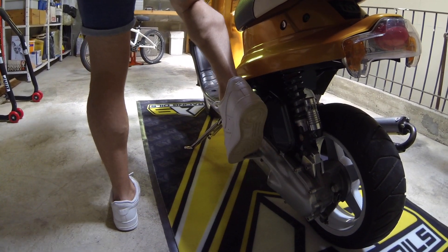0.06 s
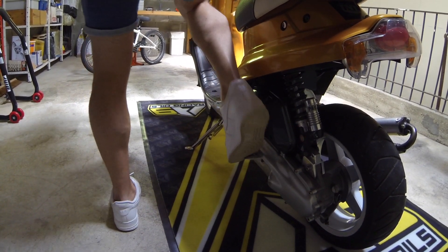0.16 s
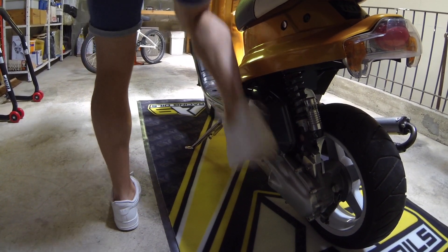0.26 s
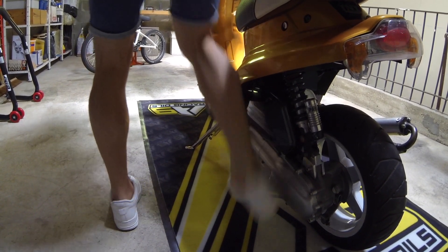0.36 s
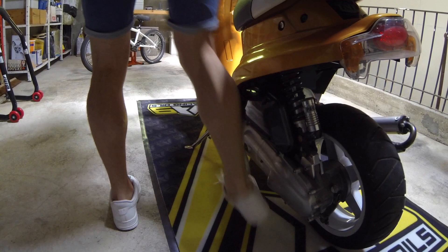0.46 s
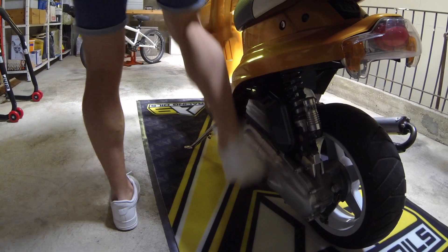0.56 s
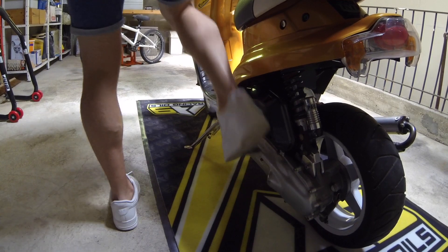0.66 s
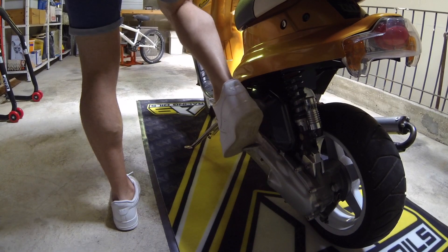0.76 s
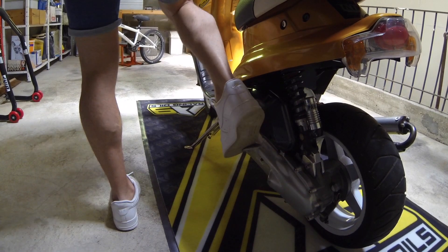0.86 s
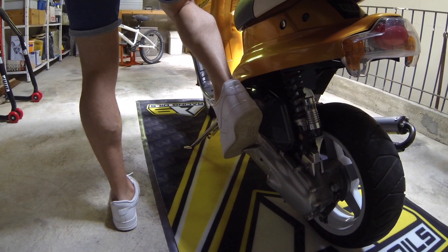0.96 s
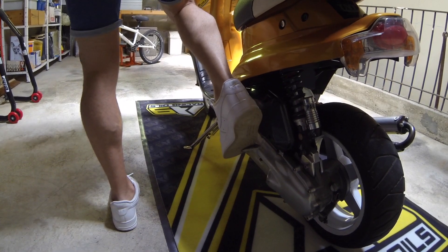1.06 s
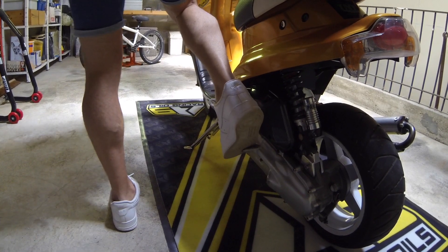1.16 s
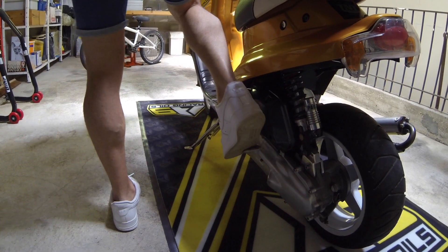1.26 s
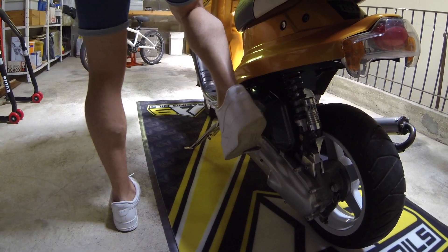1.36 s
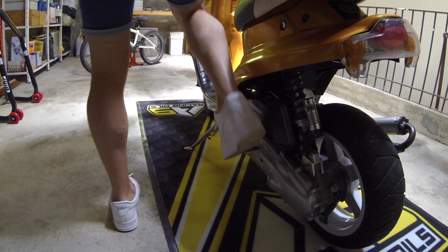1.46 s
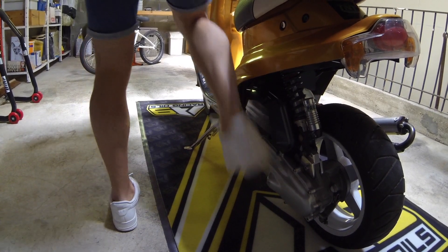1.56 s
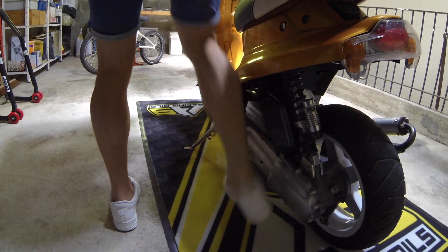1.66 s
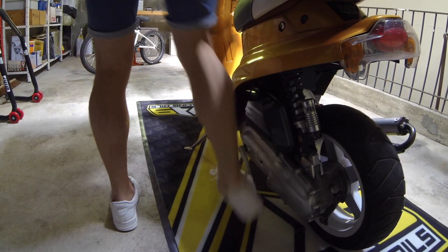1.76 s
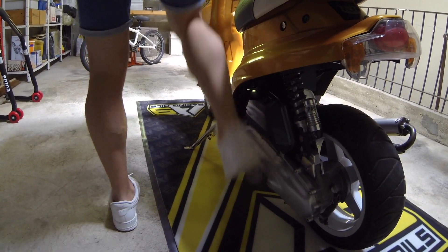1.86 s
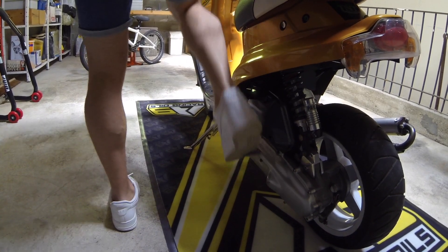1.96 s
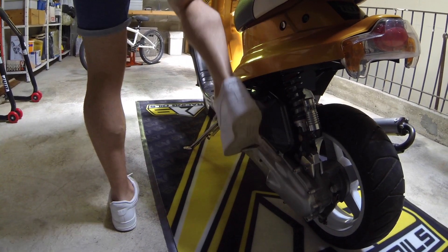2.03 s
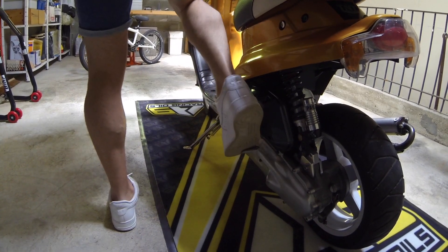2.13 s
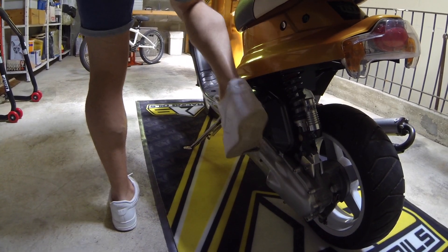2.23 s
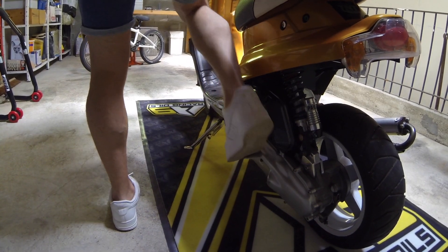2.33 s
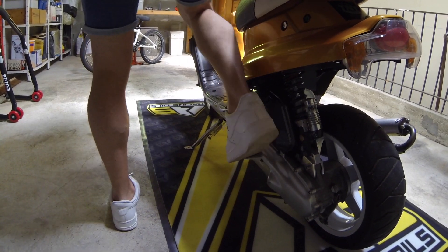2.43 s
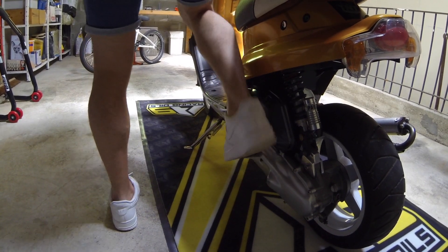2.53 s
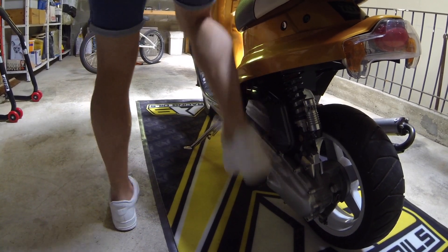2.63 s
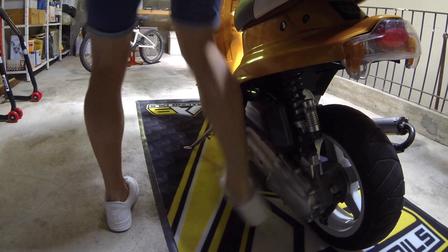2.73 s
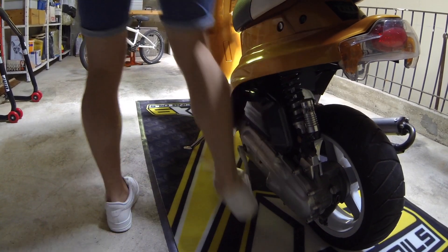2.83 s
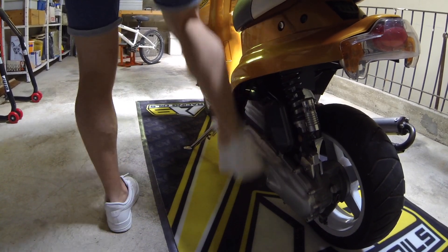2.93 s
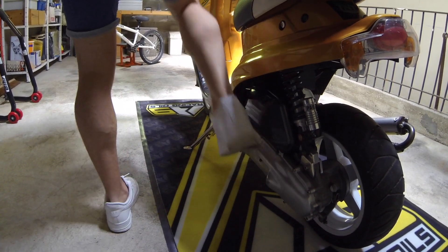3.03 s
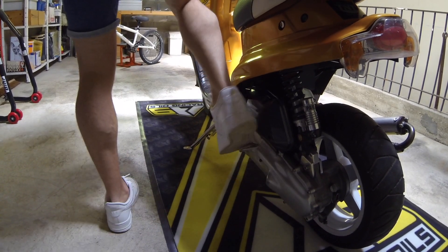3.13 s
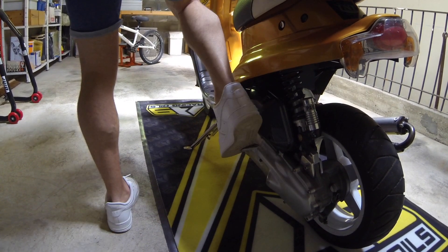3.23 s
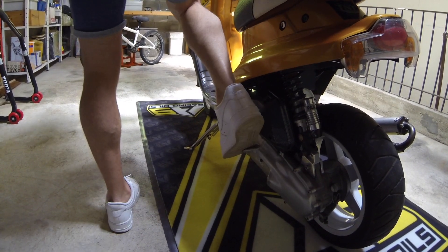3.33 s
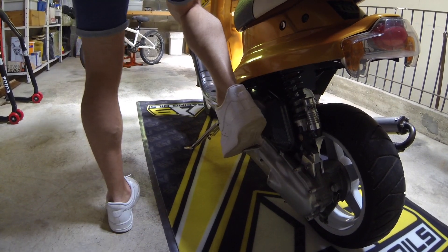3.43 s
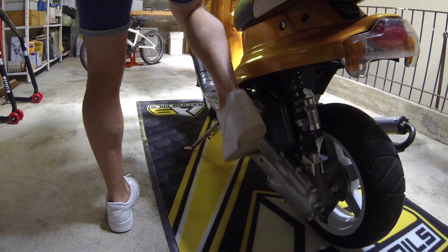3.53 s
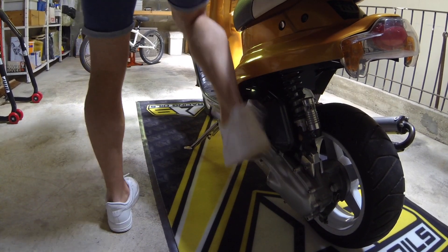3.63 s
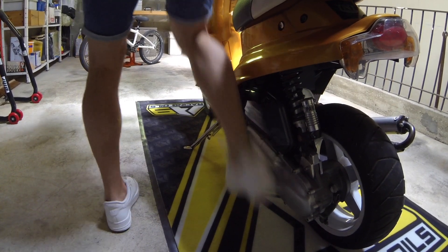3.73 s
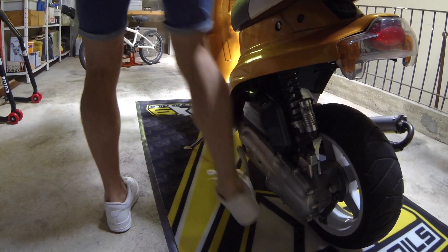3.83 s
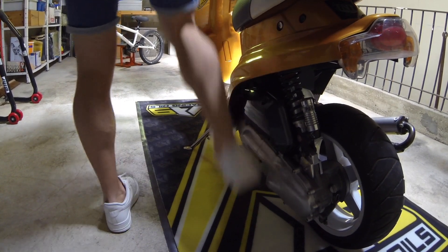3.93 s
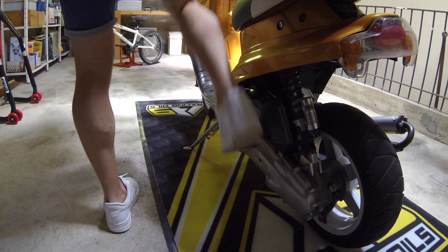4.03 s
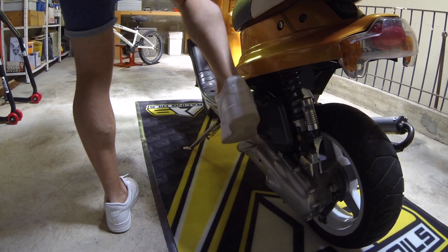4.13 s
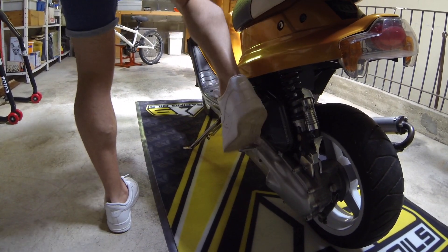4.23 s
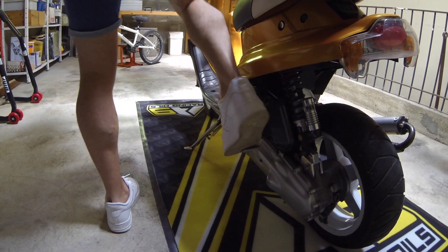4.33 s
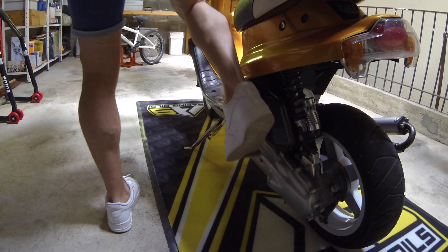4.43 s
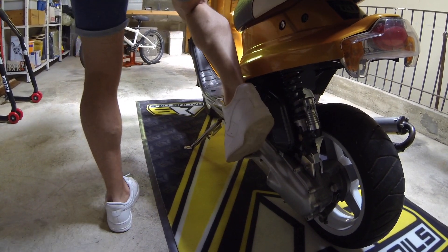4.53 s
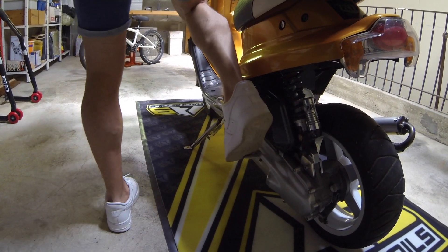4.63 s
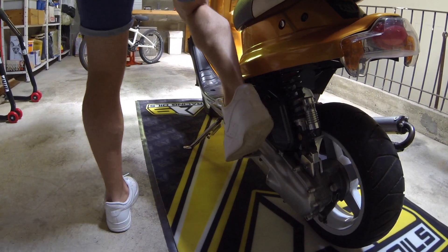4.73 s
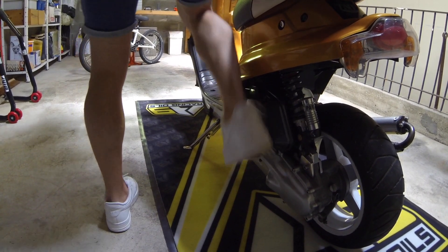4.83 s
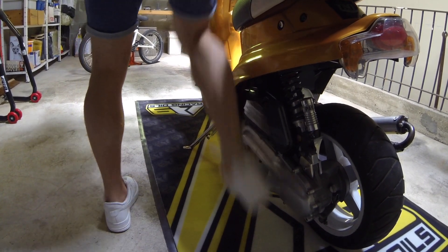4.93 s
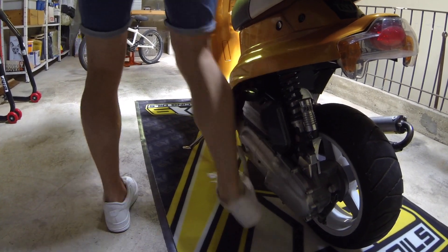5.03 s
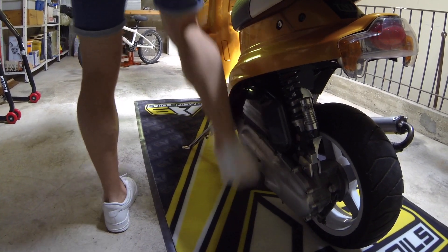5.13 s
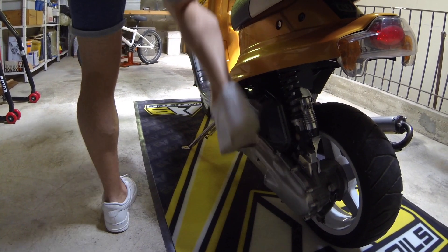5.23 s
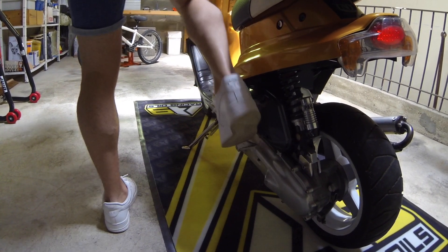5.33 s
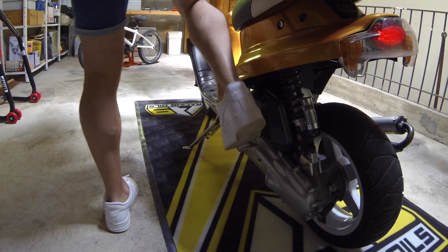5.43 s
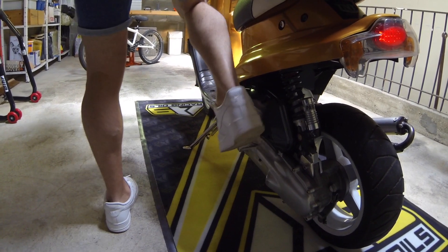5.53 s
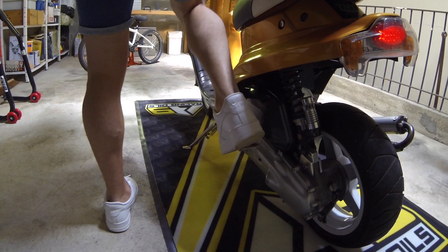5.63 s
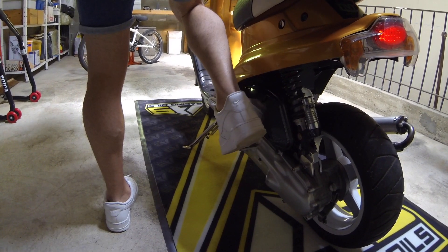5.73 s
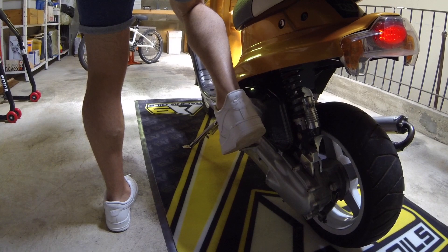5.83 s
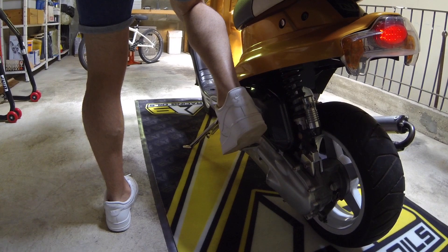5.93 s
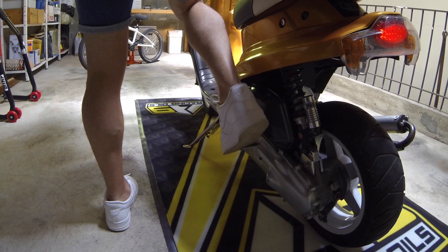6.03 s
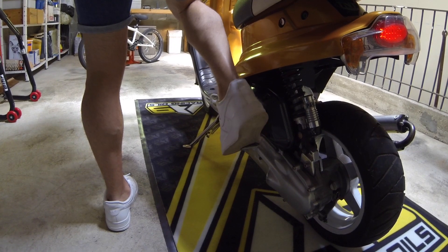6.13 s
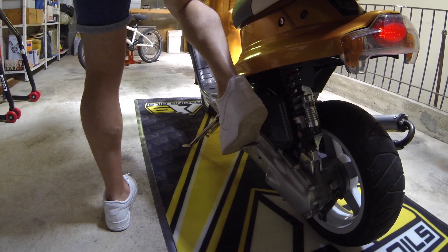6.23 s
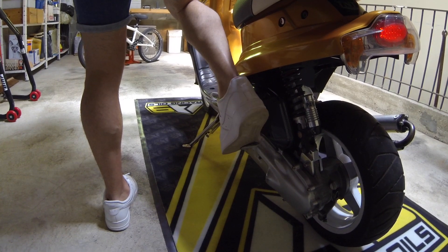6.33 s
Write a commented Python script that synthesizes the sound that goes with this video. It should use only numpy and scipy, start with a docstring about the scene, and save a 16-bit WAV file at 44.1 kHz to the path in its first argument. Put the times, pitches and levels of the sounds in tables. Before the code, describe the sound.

Heard from nearby in a lightly echoing garage, a scooter's kick-start lever slams down with a ringing metal clank while the engine turns over with a rattling, chuffing whirr and coasts to rest. The starter winds back with clicks, clunks and dull thumps. After four failed tries, a fifth kick makes the small two-stroke engine fire in ragged, raspy pops that soon weaken and slow.

```python
"""A two-stroke scooter is kicked over five times in a faintly rumbling concrete garage.
Each kick spins the starter gears, pumps air through the engine and slams the lever on its stop.
The crank coasts down; the starter gear winds back amid clicks, soft thumps and spring pings.
On the fifth kick the engine catches, fires unevenly for a second and runs down."""
import sys
import numpy as np
from scipy import signal
from scipy.fft import rfft, irfft
from scipy.io import wavfile

SR = 44100
rng = np.random.default_rng(int(sys.argv[2]) if len(sys.argv) > 2 else 0)


def unload_audio(sound):
    """Save the sound as a 16-bit wav file, at the path given as the first command line argument."""
    columns = np.transpose(np.atleast_2d(sound))
    # keep every value between -1 and 1, then stretch to whole-number steps
    steps = np.round(np.clip(columns, -1, 1) * 32767)
    wavfile.write(sys.argv[1], SR, steps.astype(np.int16))


N = 281799
TIME = np.arange(N) / SR
EVENT_TIME = TIME[:SR // 5]


def from_db(db):
    """Decibels to gain."""
    return 10 ** (np.asarray(db) / 20)


def unit_energy(x):
    """Scale to a sum of squares of 1."""
    return x / np.sqrt(np.sum(x ** 2) + 1e-20)


def unit_rms(x):
    """Scale to rms 1."""
    return unit_energy(x) * np.sqrt(len(x))


def at_hz(points, hz):
    """Read a table on a log-frequency axis."""
    freq_hz, value = np.transpose(points)
    return np.interp(np.log(np.maximum(hz, 1)), np.log(freq_hz), value)


def add(track, start_s, sound):
    """Mix a sound into a track."""
    i = int(np.clip(start_s * SR, 0, N))
    track[i:i + len(sound)] += sound[:N - i]


def through(x, response):
    """Convolve with an impulse response."""
    return signal.oaconvolve(x, response)[:N]


def lowpass(x, corner_hz, order=2):
    """Butterworth low-pass: a softer contact or a rounder pressure front."""
    sos = signal.butter(order, np.clip(corner_hz, 50, .45 * SR), fs=SR, output="sos")
    return signal.sosfilt(sos, x + 1e-18)


def colour(points, size=8192):
    """Minimum-phase, unit-energy response with a given spectral shape."""
    cepstrum = irfft(np.log(from_db(at_hz(points, np.fft.rfftfreq(size, 1 / SR)))))
    cepstrum[size // 2:] = 0
    cepstrum[1:] *= 2
    return unit_energy(irfft(np.exp(rfft(cepstrum))))


def body(modes, size=4096):
    """Unit-energy response of parallel resonances, alternating in sign."""
    t = TIME[:size]
    rings = [from_db(db) * width_hz * np.exp(-np.pi * width_hz * t) * np.cos(2 * np.pi * hz * t)
             for hz, width_hz, db in modes]
    return unit_energy(sum(rings[::2]) - sum(rings[1::2]))


def burst(decay_s):
    """Chattering contact: noise with a Gaussian decay."""
    return unit_energy(rng.standard_normal(len(EVENT_TIME)) * np.exp(-(EVENT_TIME / decay_s) ** 2))


def scuff(decay_s):
    """Hard contact that trails off: noise with an exponential decay."""
    return unit_energy(rng.standard_normal(len(EVENT_TIME)) * np.exp(-EVENT_TIME / decay_s))


def grains(per_s, spread_db):
    """Tiny impacts of uneven size at random times."""
    sizes = rng.choice([-1, 1], N) * from_db(spread_db * np.minimum(rng.exponential(1, N), 3))
    return unit_rms(sizes * (rng.random(N) < per_s / SR))


# background spectrum: freq_hz, gain_db
RUMBLE_COLOUR = [(12, -22.5), (22, -3), (50, -7), (87, -14), (150, -20), (200, -26.5), (450, -28),
                 (800, -35), (1400, -39.5), (2500, -44), (5000, -50.5), (12000, -58.5), (15000, -61.5)]


def rumble():
    """Steady low noise of the garage."""
    return from_db(-51) * unit_rms(through(rng.standard_normal(N), colour(RUMBLE_COLOUR)))


# reverb decay: freq_hz, t60_s
GARAGE_DECAY = [(60, 0.71), (250, 0.35), (700, 0.64), (1500, 0.54), (3000, 0.5), (6000, 0.41),
                (14000, 0.53)]


def garage(x, tail_db, early_db):
    """Concrete room: dense early reflections and a tail that decays per octave."""
    t = TIME[:SR]
    white, hz = rfft(rng.standard_normal(SR)), np.fft.rfftfreq(SR, 1 / SR)
    octave = np.round(np.log2(np.maximum(hz, GARAGE_DECAY[0][0])))
    tail = sum(irfft(white * (octave == k), SR) * from_db(-60 * t / at_hz(GARAGE_DECAY, 2 ** k))
               for k in np.unique(octave))
    early = rng.standard_normal(SR) * np.exp(-t / 0.027)
    onset = np.clip((t - .002) / .005, 0, 1)
    room = from_db(tail_db) * unit_energy(tail * onset) + from_db(early_db) * unit_energy(early * onset)
    return through(x, room)


# spring strikes: start_s, level_db
SPRING_PINGS = [(0.73, -41), (2.012, -34.5), (3.121, -39.5), (4.113, -36), (4.185, -32.5)]


def spring_pings():
    """The return spring rings in two high modes."""
    force = np.zeros(N)
    for start_s, db in SPRING_PINGS:
        add(force, start_s, from_db(db) * scuff(0.0041))
    spring = through(force, body([(9140, 670, 26), (12300, 2600, 17)]))
    return spring + garage(spring, tail_db=-6.0, early_db=-5.5)


# spectrum of thumps and pumped air: freq_hz, gain_db
AIR_COLOUR = [(20, -13), (45, -4.5), (65, 0.5), (95, -5.5), (128, 5.5), (185, -15), (245, -4), (310, -12.5),
              (420, -7.5), (1000, -54.5), (4000, -56)]
# soft thumps: start_s, level_db
THUMPS = [(0.624, -10.5), (1.8, -5.5), (2.934, -4.5), (3.989, -4.5), (4.175, -10.5), (4.518, -20.5)]


def settling_thumps():
    """The piston rocks back and the scooter settles."""
    force = np.zeros(N)
    for start_s, db in THUMPS:
        add(force, start_s, from_db(db) * burst(0.043))
    return through(force, colour(AIR_COLOUR))


# metal contact spectrum: freq_hz, gain_db
METAL_COLOUR = [(100, -3), (300, 9.5), (800, 13.5), (1400, 7), (2400, 7.5), (3800, 2.5), (5500, -7.5),
                (7500, -20.5), (10000, -13.5), (15000, -31)]


def click(db, decay_s, rise_s=0.0023, db_per_octave=13):
    """One metal contact seats: the harder, the brighter."""
    seating = np.clip(EVENT_TIME / rise_s, 0, 1)
    corner_hz = 18820 * 2 ** (db / db_per_octave)
    force = lowpass(unit_energy(seating * scuff(decay_s)), corner_hz)
    return from_db(db + 11.5) * through(force, colour(METAL_COLOUR))


# linkage contacts: start_s, strength_db, decay_s
LINKAGE_CLICKS = [(.659, -34, 0.0049), (0.799, -30.5, 0.012), (1.223, -26, 0.0083), (2.024, -27, 0.012),
                  (2.234, -23, 0.006), (2.831, -14.5, .012), (2.854, -7, 0.004), (3.418, -17.5, 0.0046),
                  (3.484, -17, 0.0035), (3.961, -24, .008), (4.317, -17, 0.0035), (4.386, -27, .004),
                  (5.133, -17, .008)]


def linkage_clicks():
    """Lever, pawl and shoe knock, metal on metal."""
    clicks = np.zeros(N)
    for start_s, db, decay_s in LINKAGE_CLICKS:
        add(clicks, start_s, click(db, decay_s))
    return clicks + garage(clicks, tail_db=-6.0, early_db=-5.5)


# starter gear returns: start_s, strength_db, decay_s
GEAR_RETURNS = [(.925, -38, 0.039), (1.466, -31, 0.025), (1.869, -8, 0.0097), (1.9, -7, 0.024),
                (2.462, -24, 0.027), (3.044, -9.5, .016), (4.092, -7.5, 0.03)]
# resonances of the return: pitch_hz, width_hz, gain_db
RETURN_MODES = [(470, 51, -9), (617, 41, -2.5), (711, 125, 11), (900, 120, -2)]


def gear_return():
    """The starter gear winds back with a clunk and lands with a click."""
    winding, landing = np.zeros((2, N))
    for start_s, db, decay_s in GEAR_RETURNS:
        add(winding, start_s, from_db(db) * scuff(decay_s))
        add(landing, start_s, click(db - 8, decay_s=.009))
    clunk = from_db(9.0) * lowpass(through(winding, body(RETURN_MODES)), 1500)
    room = garage(clunk, tail_db=-6.5, early_db=-2.0) + garage(landing, tail_db=-6.0, early_db=-5.5)
    return clunk + landing + room


# lever hits its stop: start_s, strength_db
LEVER_STOPS = [(0.3282, 3), (1.6239, 0.5), (2.678, 2.5), (3.7172, 2), (4.922, 1.5)]
# crankcase resonances: pitch_hz, width_hz, gain_db
CRANKCASE_MODES = [(223, 23, 2.5), (439, 15, 23.5), (800, 62, 15.5), (1280, 16, 3.5), (1800, 120, 7),
                   (2330, 530, -24), (2920, 640, 4.5), (4150, 380, -16), (3910, 220, -18), (4990, 120, -28)]


def lever_stop():
    """The lever slams home: the crankcase rings, bodywork excites the room, the frame booms."""
    force, shake, jolt = np.zeros((3, N))
    for start_s, db in LEVER_STOPS:
        add(force, start_s, from_db([db - 6.5]))
        add(force, start_s, from_db(db + 1.5) * burst(0.0075))
        add(shake, start_s, from_db(db) * scuff(0.0095))
        add(jolt, start_s, from_db([db]))
    case = lowpass(body(CRANKCASE_MODES, size=8192), 7700) + from_db(2.5) * colour(METAL_COLOUR)
    room = garage(through(shake, case), tail_db=-6.5, early_db=-4.5)
    frame = through(jolt, body([(67, 12, -8.5), (129, 9, -0.5), (235, 18, 0)]))
    return from_db(4.5) * (through(force, case) + room) + from_db(3) * frame


def kick_stroke(since_stop_s, slack_s=.22, push_s=0.096, bite_s=0.0234, coast_s=.48):
    """Slack taken up, drive, coast: crank speed and light gear contact, as shares of full."""
    speed = np.clip(np.minimum((since_stop_s + push_s) / bite_s, 1 - since_stop_s / coast_s), 0, 1)
    slack_db = -20 + 133.5 * np.minimum(since_stop_s + push_s, 0)
    slack = (since_stop_s > -slack_s) * (since_stop_s < 0) * from_db(slack_db)
    return speed, slack


# starter gear resonances: pitch_hz, width_hz, gain_db
GEAR_MODES = [(258, 62, 4.5), (478, 27, 6), (630, 66, -11.5), (706, 250, 7.5), (905, 89, -1),
              (1230, 320, -11)]
# drive case resonances: pitch_hz, width_hz, gain_db
DRIVE_CASE_MODES = [(1302, 48, -1), (1600, 74, -3), (1660, 480, 0.5)]
# loose gear spectrum: freq_hz, gain_db
RATTLE_COLOUR = [(200, -21.5), (600, 9), (1300, 5.5), (2500, -4), (3900, -7), (5000, -10.5), (7200, -20.5),
                 (9500, -21.5), (15000, -41.5)]


def cranking(turns_per_s=23, teeth_per_turn=26):
    """Each kick whirls the gears and pumps the piston, which coasts down against compression."""
    stops_s = np.array([s for s, _ in LEVER_STOPS])
    nearest_stop_s = stops_s[np.searchsorted((stops_s[1:] + stops_s[:-1]) / 2, TIME)]
    since_stop_s = TIME - nearest_stop_s
    speed, slack = kick_stroke(since_stop_s)
    total_turns = turns_per_s * np.cumsum(speed) / SR
    turns = total_turns - np.interp(nearest_stop_s, TIME, total_turns)
    teeth = 1 + 0.48 * signal.sawtooth(2 * np.pi * teeth_per_turn * turns)
    compression = 1 + .45 * np.cos(2 * np.pi * turns)

    gears = lowpass(through(grains(2500, spread_db=0.73) * teeth, body(GEAR_MODES)), 1100, order=3)
    whirr = from_db(-28.5) * np.maximum(speed ** 4.4, slack) * unit_rms(gears)

    case = lowpass(colour(RATTLE_COLOUR), 5300) + from_db(-6.5) * body(DRIVE_CASE_MODES, size=8192)
    chatter = unit_rms(through(grains(870, spread_db=3.5) * teeth, case))
    slop_db = 7.5 * np.clip(since_stop_s / 0.11, 0, 1) ** 2   # the unloaded drive rattles more
    rattle = from_db(-39.5 + slop_db) * np.maximum(speed ** 2.36, slack) * compression * chatter

    air = unit_rms(through(rng.standard_normal(N), colour(AIR_COLOUR)))
    chuffs = from_db(-31) * speed ** 2.28 * compression * air
    starter = whirr + lowpass(rattle, 7400) + chuffs
    return starter + garage(starter, tail_db=-7.0, early_db=-6.5)


def piston_air(turns, speed, sharpness=1.7):
    """The running piston pushes out one turbulent air pulse per turn."""
    gate = np.exp(sharpness * (np.cos(2 * np.pi * turns) - 1))
    turbulence = through(gate * rng.standard_normal(N), colour(AIR_COLOUR))
    pulse = through(np.gradient(gate) / np.gradient(turns).clip(1e-9), colour(AIR_COLOUR))
    air = unit_rms(unit_rms(turbulence) + unit_rms(pulse))
    return from_db(-31.5) * (speed / speed.max()) ** 0.72 * lowpass(air, 3000)


def gear_rattle(turns, running):
    """Loose gears in the running engine knock harder once per turn."""
    knocks = (1 + 0.32 * np.cos(2 * np.pi * turns)) * grains(4000, spread_db=3.2)
    return from_db(-48) * lowpass(through(running * knocks, colour(RATTLE_COLOUR)), 4100)


# charges that go off with a bang: start_s, strength_db
BANGS = [(5.143, -9.5), (5.2232, -5.5), (5.3772, 1.5), (5.4393, 0), (5.5212, -1), (5.5842, -0.5),
         (5.6492, 1.5), (5.7165, -1.5), (5.7845, -2), (5.8772, -6.5), (5.9978, -3.5)]
# burn on ordinary turns: time_s, strength_db
BURN_CURVE = [(5.08, -18), (5.18, -6.5), (5.39, -3.5), (5.44, -22), (5.66, -17), (5.81, -11), (5.94, -14),
              (6.01, -5.5), (6.14, -19.5), (6.39, -18)]
# exhaust resonances: pitch_hz, width_hz, gain_db
EXHAUST_MODES = [(140, 42, 6.5), (232.3, 26, 12.5), (403, 45, 5.5), (446, 170, -34), (632, 100, 15.5),
                 (907, 63, 5), (892, 246, 6.5), (1140, 23, -27), (1225, 73, 3.5), (1523, 130, -0.5),
                 (1840, 200, -30), (3520, 480, -40), (3724, 190, -5.5)]
# gas jet spectrum: freq_hz, gain_db
JET_COLOUR = [(200, -14), (600, 6), (1200, -0.5), (1450, -1.5), (2200, 2), (2700, -6), (3300, -4),
              (3900, -6.5), (4500, -17), (5300, -12), (7000, -25), (9500, -20), (12000, -26), (15000, -29)]


def exhaust(turns, bang_turns, running, scatter_db=1.0, bang_hiss_db=2):
    """One pressure front and gas jet per turn: most are weak, a full burn cracks."""
    burn_db = np.interp(TIME, *np.transpose(BURN_CURVE))
    bang_db = dict(zip(bang_turns, [db for _, db in BANGS]))
    # puffs sharpen as the engine picks up, hold, then round off as it dies
    bright_octaves = np.minimum(6.2 * (TIME - 5.41), 3.22 * (5.616 - TIME)).clip(max=0)
    corner_hz = 4200 * 2 ** bright_octaves
    hiss_db = -9.5 + 2.5 * bright_octaves
    jet_rise = np.clip(EVENT_TIME / 0.0021, 0, 1)
    puffs, jets = np.zeros((2, N))
    for i in np.flatnonzero((np.diff(np.floor(turns)) > 0) & (running[1:] > 0)):
        turn = np.floor(turns[i + 1])
        strength = from_db(bang_db.get(turn, burn_db[i] + rng.normal(0, scatter_db)))
        blast = signal.unit_impulse(len(EVENT_TIME)) + .25 * scuff(.006)
        front = strength * lowpass(blast, corner_hz[i], order=4)
        add(puffs, i / SR, -front)
        add(puffs, i / SR + .0015, .8 * front)   # inverted reflection from the silencer
        gas = lowpass(jet_rise * scuff(0.013), 3.1 * corner_hz[i])
        add(jets, i / SR, strength * from_db(hiss_db[i] + bang_hiss_db * (turn in bang_db)) * gas)
    pipe = from_db(12.5) * through(puffs, body(EXHAUST_MODES))
    hiss = from_db(13) * through(jets, colour(JET_COLOUR))
    return pipe, hiss


def crank_turns(turns_per_s):
    """Crank angle, warped so that every bang falls on a whole turn; also those turns."""
    free_turns = np.cumsum(turns_per_s) / SR
    at_bangs = np.interp([s for s, _ in BANGS], TIME, free_turns)
    bang_turns = np.r_[0, np.cumsum(np.round(np.diff(at_bangs)))]
    return free_turns + np.interp(free_turns, at_bangs, bang_turns - at_bangs), bang_turns


# nominal crank speed once the engine catches: time_s, turns_per_s
CRANK_SPEED = [(5.08, 15), (5.24, 32.5), (5.4, 49), (5.5, 48.8), (6.05, 40), (6.39, 34)]


def engine():
    """The two-stroke catches and runs down: exhaust, gear rattle and piston air follow the crank."""
    turns_per_s = np.interp(TIME, *np.transpose(CRANK_SPEED))
    turns, bang_turns = crank_turns(turns_per_s)
    running = np.clip((TIME - CRANK_SPEED[0][0]) / 0.0068, 0, 1)
    direct, hiss = exhaust(turns, bang_turns, running)
    pipe = direct.copy()
    for lag_s, db in [(.0053, -21), (.0137, -9.5), (.027, -15.5)]:   # floor, side wall, ceiling
        add(pipe, lag_s, from_db(db) * direct)
    noise = hiss + gear_rattle(turns, running)
    air = running * piston_air(turns, turns_per_s)
    room = garage(pipe, tail_db=-1, early_db=-4.5) + garage(noise, tail_db=3.5, early_db=-5.5)
    return pipe + noise + air + room


def scene():
    """The scooter over the garage rumble, mono."""
    mix = rumble() + cranking() + lever_stop()
    mix += linkage_clicks() + gear_return() + spring_pings() + settling_thumps()
    return (mix + engine())[None]


def record(dry, ceiling=1.1, cutoff_hz=15100):
    """Soft clip, then a steep low-pass."""
    rounded = ceiling * np.tanh(dry / ceiling)
    return signal.sosfilt(signal.ellip(12, .2, 90, cutoff_hz, fs=SR, output="sos"), rounded)


dry = scene()
out = record(dry)
unload_audio(out)
```